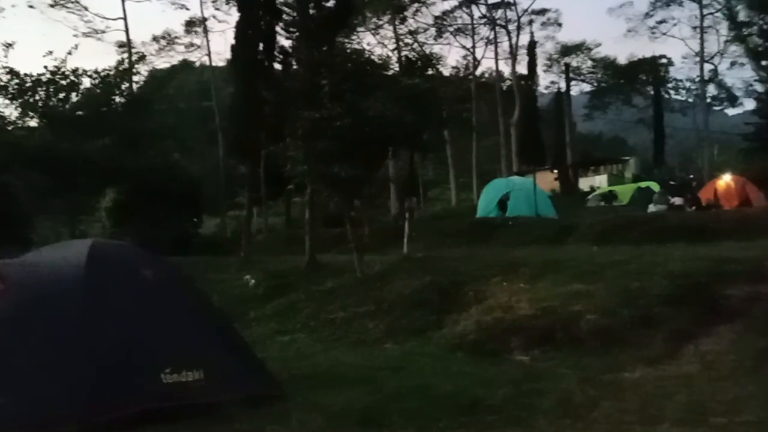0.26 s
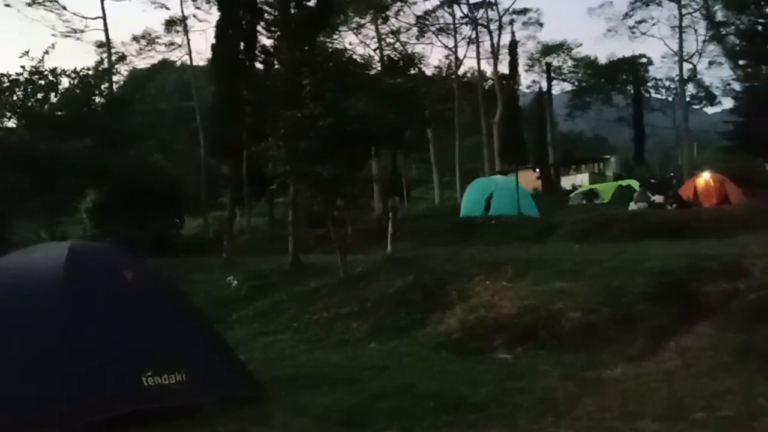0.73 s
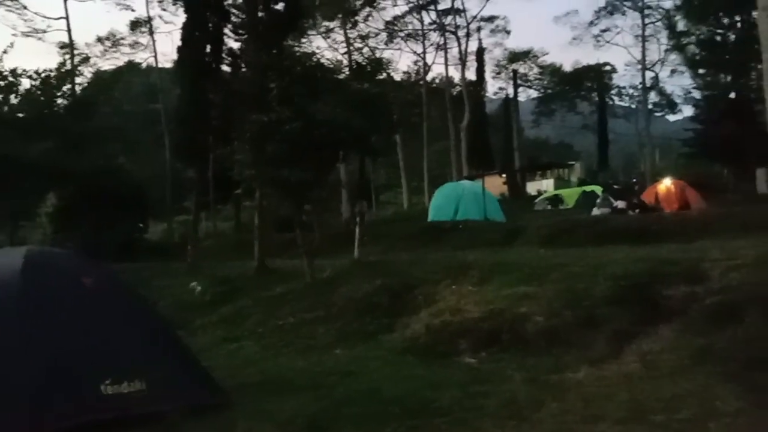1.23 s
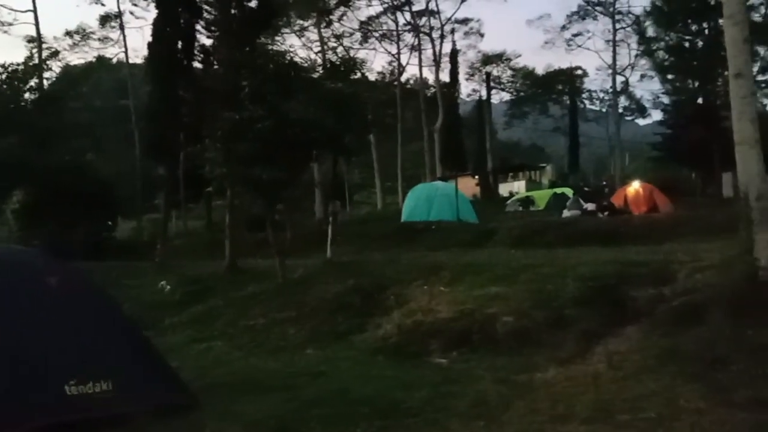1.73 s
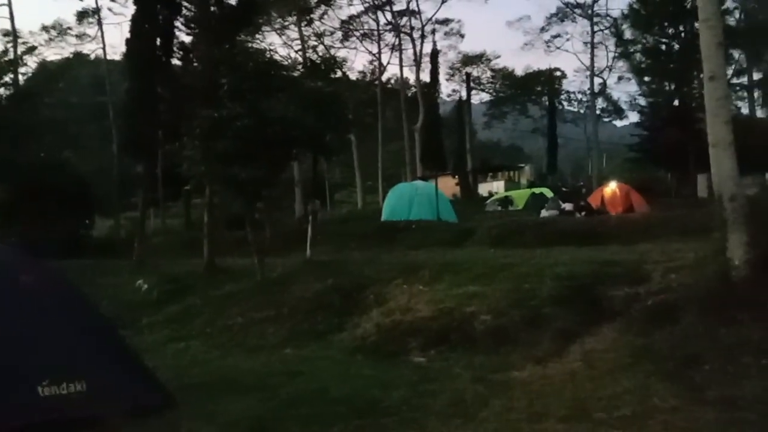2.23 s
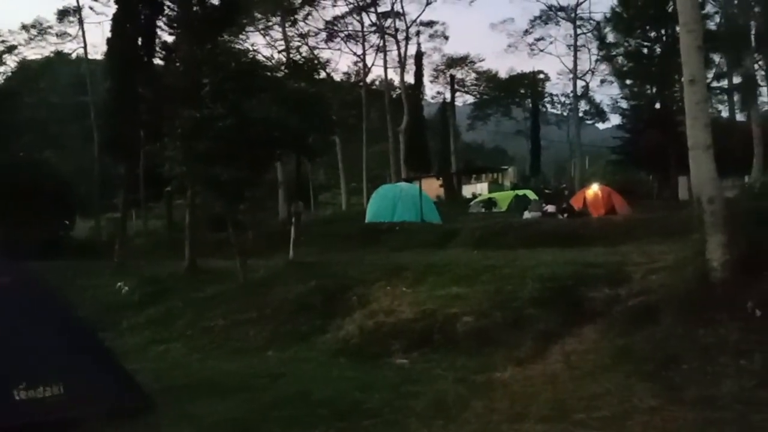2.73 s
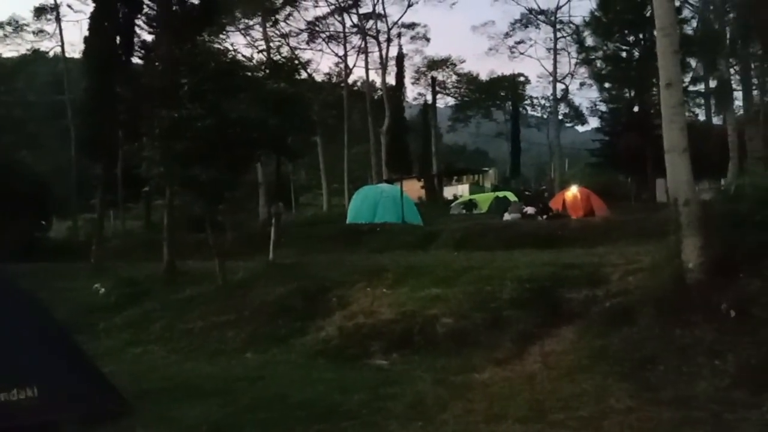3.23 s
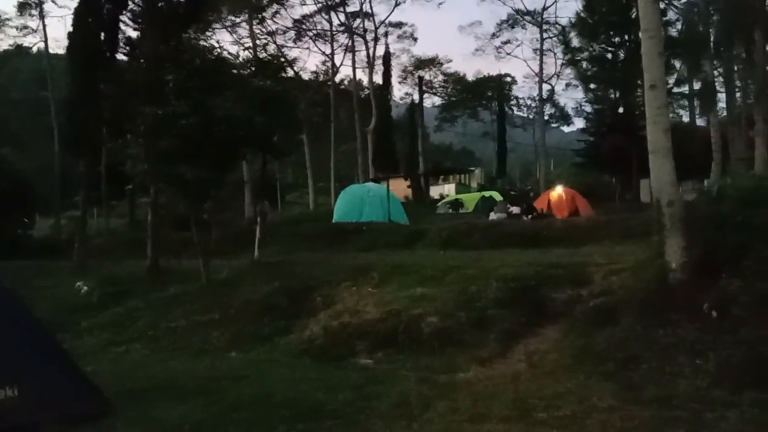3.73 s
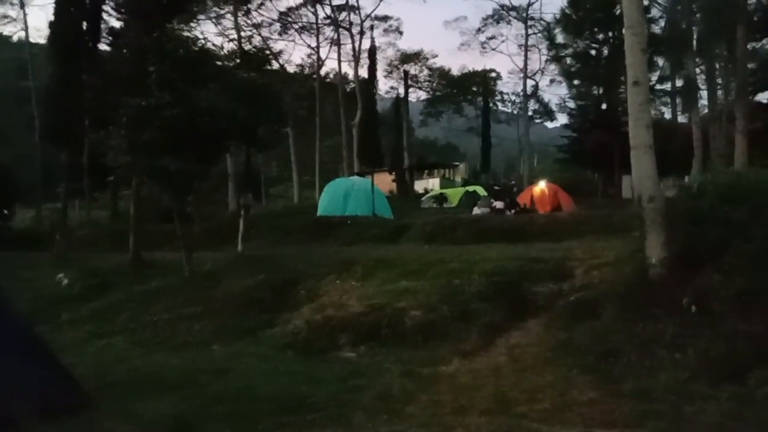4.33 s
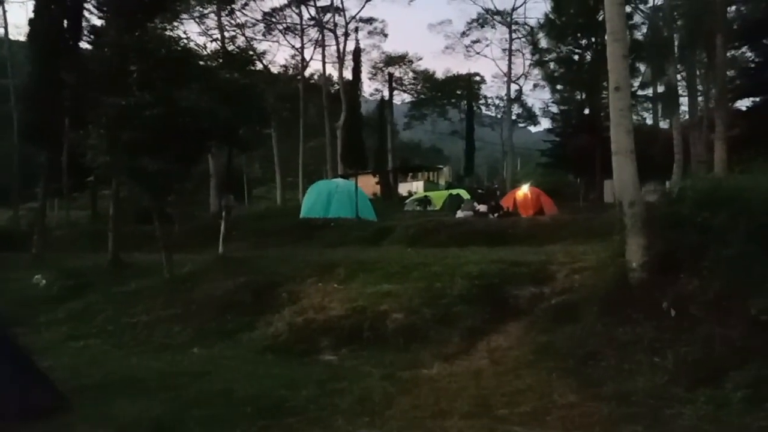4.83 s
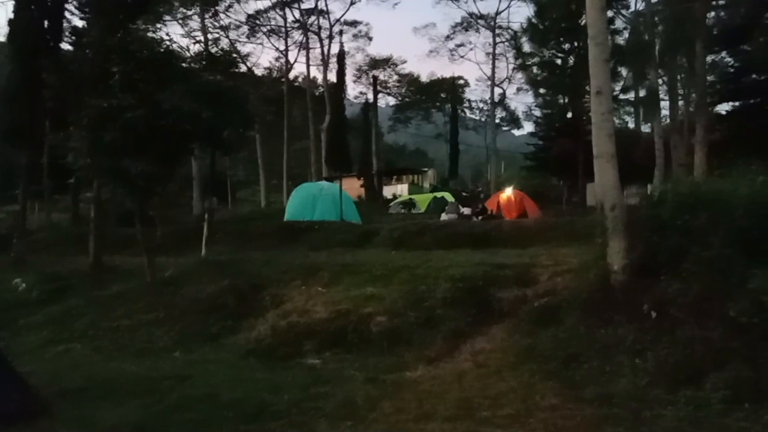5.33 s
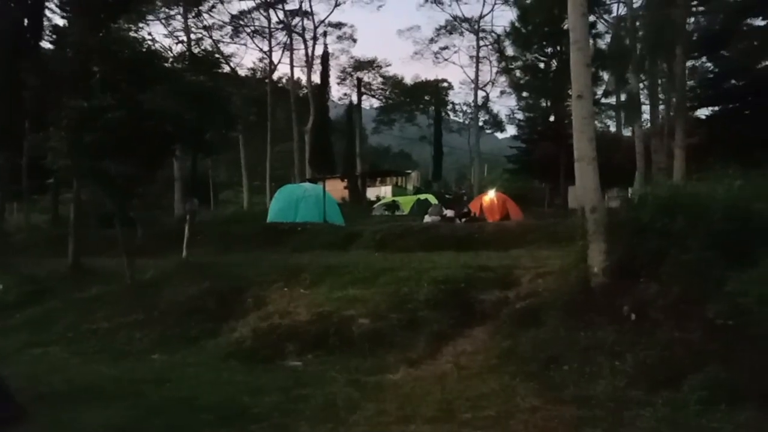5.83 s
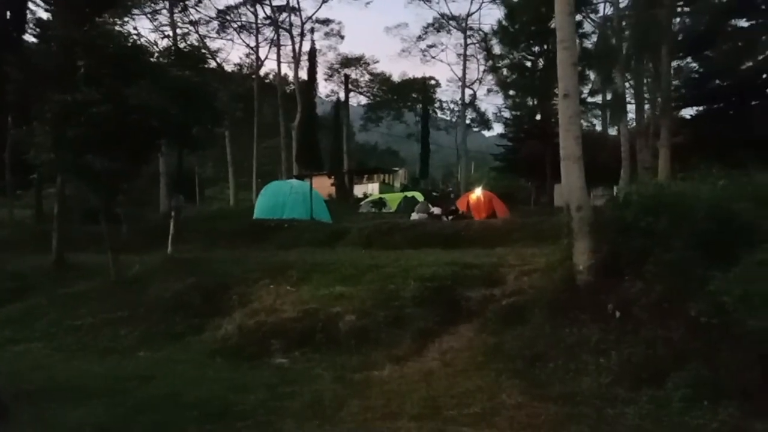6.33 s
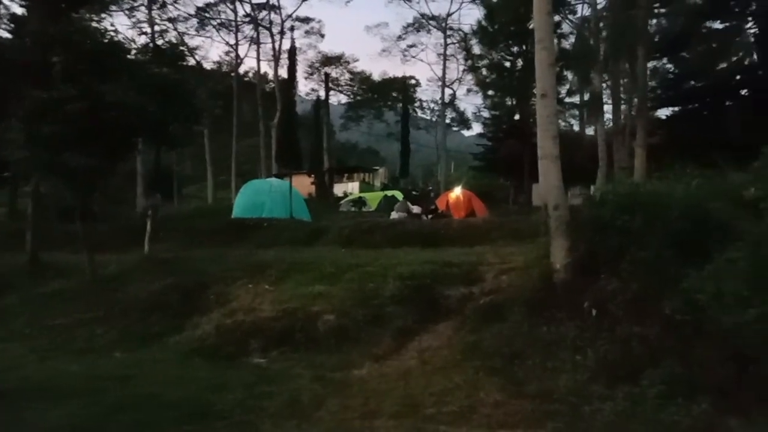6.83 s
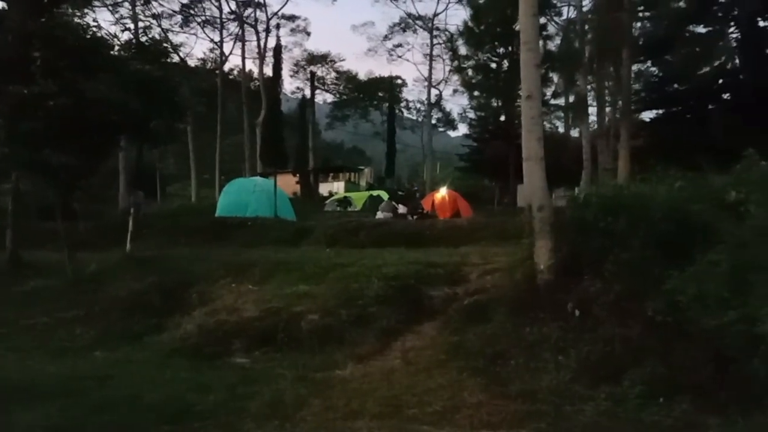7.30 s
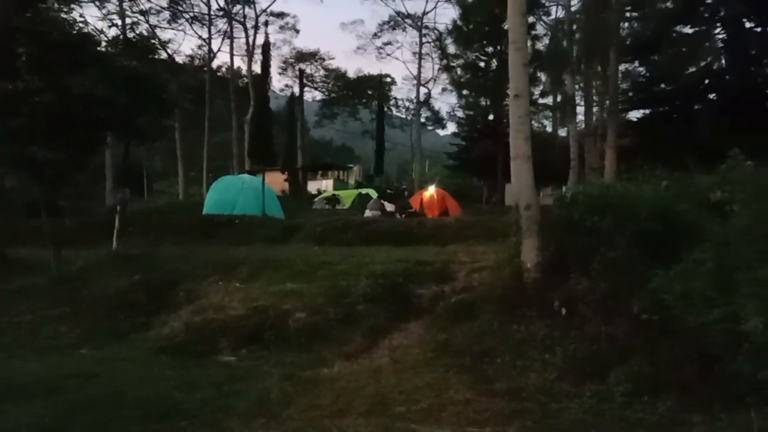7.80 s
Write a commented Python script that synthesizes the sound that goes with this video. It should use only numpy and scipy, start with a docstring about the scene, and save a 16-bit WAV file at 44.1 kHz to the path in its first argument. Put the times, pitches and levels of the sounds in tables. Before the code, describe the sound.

At a forest campsite at dusk, small birds chatter in swells throughout, their short whistles and slurred notes echoing lightly among the trees. Behind them insects hiss faintly, a cricket chirps about once a second and a far bird gives a few soft hoots. From about halfway the handheld phone is bumped softly and a faint low hum comes up. Near the end its case clicks once.

```python
"""Dusk at a forest campsite. From the start small birds chatter in swells, and their whistles and slurs
echo among the trees. Behind them an insect chorus hisses, a cricket chirps about once a second and a
far bird hoots softly; the phone's noise suppressor lets the background up whenever the flock is loud.
From about halfway the phone is bumped softly and a faint hum comes up. Near the end its case clicks."""
import sys
import numpy as np
from scipy import signal
from scipy.fft import rfft, irfft, next_fast_len
from scipy.io import wavfile
from scipy.ndimage import uniform_filter1d

SR = 44100
rng = np.random.default_rng(int(sys.argv[2]) if len(sys.argv) > 2 else 0)


def pcm_store(signal):
    """Save signal as 16-bit PCM."""
    levels = np.round(np.clip(np.atleast_2d(signal), -1, 1) * 32767)
    wavfile.write(sys.argv[1], SR, levels.astype(np.int16).T)


N = 355434
TIME = np.arange(N) / SR

# Each row: start and length in seconds, first, held and last pitch in Hz, level in dB.
WHISTLE_NOTES = [(0.324,0.085,3220,2717,2690,-42), (0.448,0.078,3450,3025,2520,-47.5),
                 (0.527,0.066,3050,3080,2990,-48.5), (0.646,0.12,2883,2708,2780,-42.5),
                 (0.846,0.076,2382,2516,1830,-39), (1.102,0.062,3280,3220,2580,-55),
                 (1.443,.095,3170,2897,2940,-50), (1.657,0.045,3620,3460,3570,-51.5),
                 (1.786,.055,3420,2970,3100,-59), (2.052,0.055,3000,3240,3180,-49),
                 (2.16,0.091,3330,2960,3020,-40.5), (2.238,0.051,2907,2886,2790,-47),
                 (2.826,0.034,3190,3260,3040,-66), (3.15,.072,2895,2750,2880,-54),
                 (3.597,0.085,2320,2850,2920,-52.5), (3.752,0.055,2520,2754,2770,-40.5),
                 (3.891,.04,2770,3160,2960,-41.5), (4.038,0.068,2677,2600,3100,-46.5),
                 (4.388,0.079,3250,2970,2630,-59.5), (4.851,0.075,2980,2900,2920,-40),
                 (5.029,0.078,2680,2573,2094,-39), (5.268,0.05,2940,3198,3040,-41),
                 (5.354,.044,2520,2910,2890,-38.5), (5.39,0.056,3137,2922,2795,-39),
                 (5.619,0.094,2490,2973,3020,-40), (5.683,.076,2164,2841,2807,-35),
                 (6.584,.06,2750,2705,2140,-38), (6.956,.075,2920,2685,2710,-50.5),
                 (7.255,.062,2733,2690,2200,-45)]
# Each row: start in seconds, middle pitch in Hz, glide in octaves, level in dB.
SLUR_NOTES = [(.234,3317,-0.078,-51.5), (.569,2216,-0.083,-48.5), (.787,2104,0.56,-47),
              (1.354,2653,-0.013,-56.5), (1.869,2470,-0.47,-58), (2.342,2910,-0.12,-58.5),
              (2.58,2825,-.12,-58), (2.74,2480,-.38,-61), (2.877,2175,0.1,-54.5), (2.927,2350,-0.15,-52),
              (3.415,2810,0.044,-48.5), (3.473,2415,-.35,-53.5), (3.861,2660,.09,-48.5),
              (4.017,3010,-.2,-56.5), (4.103,2560,-.4,-45.5), (4.338,3430,-0.2,-72.5),
              (4.758,3113,0.015,-44), (5.077,3490,0.024,-45), (5.198,3220,-0.16,-53.5),
              (5.285,2480,-.27,-50), (5.513,3200,0.12,-43), (5.741,3170,-0.018,-41.5),
              (6.201,3183,0.089,-50.5), (6.384,2630,-.26,-41), (6.695,2130,0.082,-43.5),
              (7.761,2850,-0.22,-57.5), (7.938,3350,-0.068,-50.5)]
# Hoarse rising notes. Each row: start and length in seconds, middle pitch in Hz, level in dB.
RISER_NOTES = [(1.926,0.042,4300,-60.5), (5.393,0.043,3950,-46.5), (6.352,0.076,3600,-58),
               (7.966,0.062,4310,-58.5)]
# A busier flock calls more roughly. Each row: flock level in dB, roughness from 0 to 1.
CALL_ROUGHNESS = [(-58, 0.12), (-50, 0.22)]
def near_birds(flock_db, slur_s=0.0363, riser_octaves=0.3, riser_rough=0.5):
    """Reverberation: calls scatter off near trunks, then the forest. Returns sound and dry envelope."""
    slurs = [(start, slur_s, *slide(hz, octaves), db) for start, hz, octaves, db in SLUR_NOTES]
    risers = [(start, length, *slide(hz, riser_octaves), db, riser_rough)
              for start, length, hz, db in RISER_NOTES]
    rough = np.interp(flock_db, *np.transpose(CALL_ROUGHNESS))
    calls = [(*row, np.interp(row[0], TIME, rough)) for row in WHISTLE_NOTES + slurs]
    tone, envelope = notes(calls + risers)
    scattered = reverb(tone, db=-10, decay_s=0.015)
    return reverb(scattered, db=-12, decay_s=0.08), envelope


def notes(rows, bend_s=0.02976, fade_in_s=0.012, fade_out_s=0.007, waver=0.007, uneven_db=1.34):
    """Frequency and amplitude modulation roughen tones that bend onto a held pitch and off it."""
    tone, envelope = np.zeros(N), np.zeros(N)
    shake, tremor, sway = np.tanh(walk(950)), walk(350), walk(70)
    for start, length, first, held, last, db, rough in rows:
        t = TIME[:int(length * SR)]
        u, left = t / t[-1], t[-1] - t
        at = int(rng.random() * (N - SR)) + np.arange(len(t))  # this note's stretch of the modulators
        entering, leaving = np.maximum(1 - np.array([t, left]) / min(bend_s, t[-1]), 0) ** 2
        glide = held + (first - held) * entering + (last - held) * leaving
        hz = glide * (1 + 0.144 * rough * shake[at] + waver * sway[at])
        fade = np.minimum(t / fade_in_s, left / fade_out_s)
        edges = np.sin(np.pi / 2 * np.minimum(fade, 1)) ** 2
        arch = (u * np.sqrt(1 - u)) ** 0.32  # builds up, then breaks off
        shape = unit(arch * edges * undb(uneven_db * sway[at]))
        flutter = np.exp(0.75 * rough * tremor[at])
        add(tone, start, undb(db) * unit(shape * flutter * sine(hz)))
        add(envelope, start, undb(db) * shape)
    return tone, envelope


# Swells of chatter. Each row: start and length in seconds, nominal level in dB.
FLOCK_SWELLS = [(0.108,0.19,-58.5), (0.331,0.37,-52.5), (0.742,0.23,-45.5), (2.038,0.17,-58.5),
                (2.167,0.093,-49.5), (2.554,0.14,-62), (2.84,0.19,-57), (3.44,0.3,-50), (3.84,0.21,-65),
                (4.143,0.094,-60.5), (5.04,0.32,-57.5), (5.294,0.13,-47), (5.459,0.55,-49.5),
                (5.663,0.097,-50), (6.138,0.23,-53), (6.333,0.39,-44.5), (6.954,0.42,-51.5),
                (7.241,0.096,-53), (7.38,0.42,-61.5), (7.962,0.18,-52)]
def flock_level(attack_s=0.019, grow_db=5.5, release_s=0.053, rest_db=-70.5):
    """Incoherent sources add in power: swells rise and die over a resting level. Returns dB."""
    power = undb(rest_db + 0.61 * walk(4.1)) ** 2
    for start, length, db in FLOCK_SWELLS:
        age = TIME - start
        attack = np.clip(age / attack_s, 0, 1)
        growth = undb(db + grow_db * (np.clip(age / length, 0, 1) - 1.5))
        release = np.exp(-np.maximum(age - length, 0) / release_s)
        power += (attack * growth * release) ** 2
    return 10 * np.log10(power)


def twitter(flock_db, centre_hz=2530, glide_octaves=0.1944, rough=0.21, count=460):
    """Superposition: many tiny glides overlap and reverberate, following the flock's level."""
    rows = []
    for slot, (offset, stretch) in enumerate(rng.random((count, 2))):
        start = TIME[int((slot + offset) / count * N)]
        height, slope, strength = np.clip(rng.standard_normal(3), -2.4, 1.6)
        pitches = slide(centre_hz * np.exp(0.17 * height), glide_octaves * slope)
        db = -2 + 2 * strength - 2.1 * height ** 2  # weaker away from the centre pitch
        rows.append((start, 0.0199 + 0.03 * stretch, *pitches, db, rough))
    return reverb(notes(rows)[0], db=-3.5, decay_s=0.093) * undb(flock_db)


# Each row: frequency in Hz, relative level in dB.
CHATTER_SPECTRUM = [(700, -35.5), (1380, -22.5), (1650, -15.5), (1950, -11.5), (2250, -3.5), (2670, 2.5),
                    (3000, -2.5), (3280, -5.5), (3550, -26.5), (4300, -23), (5600, -58)]
def chatter(flock_db, call_envelope, rate_hz=260, patchy_db=3):
    """Source and filter: the farthest calls merge into a rattle whose bands fade independently."""
    cycles = np.cumsum(rate_hz * np.exp(0.45 * walk(200))) / SR
    pulses = unit(np.diff(np.floor(cycles), prepend=0))
    wash = colour(pulses + rng.standard_normal(N), CHATTER_SPECTRUM)
    lowpasses = [signal.butter(6, hz, fs=SR, output="sos") for hz in np.linspace(1500, 3500, 7)]
    below = [0] + [signal.sosfiltfilt(sos, wash) for sos in lowpasses] + [wash]
    bands = sum((upper - lower) * undb(patchy_db * walk(19)) for lower, upper in zip(below, below[1:]))
    gain = np.hypot(undb(flock_db - 1), undb(-15) * call_envelope)
    return unit(shimmer(bands, depth_db=6)) * gain


# Two impacts heard as one click. Each row: start in seconds, nominal level in dB.
CASE_IMPACTS = [(7.607, -34.5), (7.62, -38)]
# Each row: mode frequency in Hz, relative level in dB.
CASE_RESONANCES = [(1300, -19.5), (1790, -2.5)]
# Each row: frequency in Hz, relative level in dB.
CRACK_SPECTRUM = [(950, -33), (1500, -7), (3100, -6), (3700, -20), (4700, -6.5), (5800, -15.5),
                  (8600, -17.5), (9500, -34), (11000, -19), (12500, -42)]
def case_click(rise_s=0.001, ring_s=0.0055):
    """Damped modes: each impact gives a dry crack and a short hollow ring of the case."""
    body, t = np.zeros(N), TIME[:SR // 10]
    modes = sum(undb(db) * np.sin(2 * np.pi * hz * t) for hz, db in CASE_RESONANCES)
    ringing = 2 * modes * (1 - np.exp(-t / rise_s)) * np.exp(-t / ring_s)
    for start, db in CASE_IMPACTS:
        add(body, start, undb(db) * ringing)
    return body + undb(-3) * knocks(CASE_IMPACTS, CRACK_SPECTRUM, rise_s=0.0008, decay_s=0.005)


# Each row: start in seconds, nominal level in dB.
PHONE_BUMPS = [(3.41, -60), (3.905, -57), (4.30, -59), (5.512, -52), (5.72, -61), (6.64, -50), (7.287, -56)]
def bumps():
    """Structure-borne sound: soft bumps on the phone excite a resonance near 150 Hz."""
    spectrum = [(30, -27), (80, -9), (150, 26), (240, -18), (600, -18.5), (2000, -72)]
    return knocks(PHONE_BUMPS, spectrum, rise_s=0.0065, decay_s=0.034)


def knocks(impacts, spectrum, rise_s, decay_s):
    """Impact excitation: contact noise, coloured by a body, rises fast and decays exponentially."""
    envelope, t = np.zeros(N), TIME[:SR // 2]
    for start, db in impacts:
        add(envelope, start, undb(db) * (1 - np.exp(-t / rise_s)) * np.exp(-t / decay_s))
    return envelope * unit(colour(rng.standard_normal(N), spectrum))


# Each row: centre and half width in Hz, relative level in dB.
CHORUS_BANDS = [(1797, 294, -4), (2350, 320, -4), (4268, 393, -2.5), (5110, 400, -9), (6608, 560, -10),
                (8000, 930, -15.5), (10430, 420, -38.5)]
# Each row: time in seconds, gain in dB.
CHORUS_GAIN = [(0, -62.5), (.8, -61), (1.7, -62), (4.9, -63), (5.9, -61.5), (8.06, -60.5)]
def chorus(drift_db=2, flicker_db=1.2):
    """Incoherent summation: far insects and frogs merge into bands of hiss that flicker a little."""
    bands = sum(noise(hz, width) * undb(db + drift_db * walk(1) + flicker_db * walk(17))
                for hz, width, db in CHORUS_BANDS)
    gain = undb(np.interp(TIME, *np.transpose(CHORUS_GAIN)))
    return shimmer(bands, depth_db=7) * np.exp(0.19 * walk(670)) * gain


# Each row: start in seconds, nominal level in dB.
CRICKET_CHIRPS = [(-.022, -66), (0.962, -65), (2.09, -62.5), (3.059, -63), (4.094, -63.5), (5.397, -61.5),
                  (6.339, -62), (7.335, -59.5)]
def cricket(period_s=0.034, stroke_s=0.012, first_hz=6420, last_hz=6040, first_stroke_db=-5):
    """Stridulation: five grainy wing strokes make a chirp, each falling in pitch."""
    chirps = np.zeros(N)
    u = np.linspace(0, 1, int(stroke_s * SR))
    for start, db in CRICKET_CHIRPS:
        for k in range(5):
            hz = (first_hz + (last_hz - first_hz) * u) * (1 + 0.0032 * rng.standard_normal())
            stroke = unit(np.sin(np.pi * u) * sine(hz, rng.random()))
            add(chirps, start + k * period_s, undb(db + first_stroke_db * (k == 0)) * stroke)
    return reverb(chirps * np.exp(0.29 * walk(450)), db=-8, decay_s=0.024)


# Each row: start and length in seconds, first and last pitch in Hz, level in dB.
FAR_HOOTS = [(0.261,0.079,620,578,-70), (.343,0.082,594,510,-73.5), (3.893,0.092,857,905,-65)]
def hoots(waver=0.014):
    """Scattering by the trees smears a far bird's soft, wavering glides."""
    calls = np.zeros(N)
    for start, length, first, last, db in FAR_HOOTS:
        u = np.linspace(0, 1, int(length * SR))
        hz = (first + (last - first) * u) * (1 + waver * walk(72)[:len(u)])
        add(calls, start, undb(db) * unit(np.sin(np.pi * u) * sine(hz)))
    return reverb(calls, db=-5, decay_s=0.026)


def rumble(rise_db_per_s=0.5, patchy_db=2.5):
    """Filtered noise: air and the hand on the phone give a slowly growing low rumble."""
    air = unit(colour(rng.standard_normal(N), RUMBLE_SPECTRUM))
    return air * undb(-76 + rise_db_per_s * TIME + patchy_db * walk(10.4))


def drone(hz=161):
    """A drifting pure tone: a faint hum, perhaps a far motor, comes up in the second half."""
    hum = unit(sine(hz * (1 + 0.00985 * walk(2.1))))
    fade = np.interp(TIME, [4.5, 5.4, 7.4, 8.06], [0.01, 0.35, 0.57, 0.33])
    return hum * undb(-74.5 + 2 * walk(18)) * fade


# Each row: time in seconds, nominal level in dB.
BUZZ_LEVEL = [(0, -102), (2.2, -86.5), (2.9, -93), (4.1, -87.5), (6.4, -101), (6.65, -88), (8.06, -90)]
def buzz(hz=11250, width_hz=260, flicker_db=3):
    """Narrowband noise: one insect's thin, high buzz comes and goes."""
    level_db = np.interp(TIME, *np.transpose(BUZZ_LEVEL))
    return noise(hz, width_hz) * undb(level_db + flicker_db * walk(20))


def high_chirps(hz=10450, spread=0.026, length_s=0.058, db=-93, rough=0.21, count=60):
    """A random point process: tiny, very high insect chirps fall at independent moments."""
    rows = [(when * N / SR, length_s, *slide(hz * np.exp(spread * (4 * height - 2)), 0), db, rough)
            for when, height in rng.random((count, 2))]
    return notes(rows)[0]


def suppressor(sound, unity_db=-50, slope=0.4, window_s=0.026):
    """Dynamic expansion: the noise suppressor's gain grows with the short-term rms of a sound."""
    power = uniform_filter1d(sound ** 2, int(window_s * SR)) + 1e-14
    return (np.sqrt(power) / undb(unity_db)) ** slope


def shimmer(x, depth_db, size=1536):
    """Spectral modulation: narrow lines of a hiss each come and go in about a tenth of a second."""
    lines = signal.stft(x, nperseg=size)[2]
    chance = uniform_filter1d(rng.standard_normal(lines.shape), 5, axis=1)
    chance = unit(uniform_filter1d(chance, 3, axis=0))
    flickering = signal.istft(lines * undb(depth_db * np.tanh(chance)), nperseg=size)[1]
    return unit(flickering[:N]) * np.std(x)


def colour(x, spectrum, size=4096):
    """Minimum-phase filtering: x rings through a body with the given (Hz, dB) spectrum."""
    hz, db = np.transpose(spectrum)
    gain = undb(np.interp(np.log(np.fft.rfftfreq(size, 1 / SR) + 1), np.log(hz), db))
    cepstrum = irfft(np.log(gain))[:size // 2]
    cepstrum[1:] *= 2
    return signal.fftconvolve(x, irfft(np.exp(rfft(cepstrum, size))))[:len(x)]


def reverb(x, db, decay_s):
    """Convolution with decaying noise adds a diffuse tail."""
    tail = rng.standard_normal(SR) * np.exp(-TIME[:SR] / decay_s)
    return x + undb(db) * signal.fftconvolve(x, tail / np.linalg.norm(tail))[:N]


def noise(centre_hz, width_hz):
    """A Gaussian band of noise, rms 1."""
    size = next_fast_len(N, real=True)
    bell = np.exp(-((np.fft.rfftfreq(size, 1 / SR) - centre_hz) / width_hz) ** 2)
    return unit(irfft(rfft(rng.standard_normal(size)) * bell, size)[:N])


def walk(rate_hz):
    """Low-pass noise as a smooth random modulator, rms 1."""
    return noise(0, rate_hz)


def sine(hz, start_cycles=0):
    """An oscillator: phase is the integral of frequency."""
    return np.sin(2 * np.pi * (np.cumsum(hz) / SR + start_cycles))


def slide(hz, octaves):
    """First, middle and last pitch of a glide, at equal ratios."""
    return hz * 2 ** (-octaves / 2), hz, hz * 2 ** (octaves / 2)


def undb(db):
    """Decibels to gain."""
    return 10 ** (np.asarray(db) / 20)


def unit(x):
    """Scale to rms 1."""
    return x / np.sqrt(np.mean(x ** 2) + 1e-20)


def add(out, start, x):
    """Mix x into out from a start time in seconds."""
    i = int(start * SR)
    x, i = x[max(-i, 0):], max(i, 0)
    out[i:i + len(x)] += x[:max(N - i, 0)]


def scene():
    """Superposition in mono: the flock's sound sets the gain of the insects, rumble and hiss."""
    flock_db = flock_level()
    calls, call_envelope = near_birds(flock_db)
    birds = calls + twitter(flock_db) + chatter(flock_db, call_envelope)
    background = chorus() + buzz() + high_chirps() + cricket() + rumble() + undb(-83) * noise(990, 1100)
    foreground = birds + bumps()
    mic_noise = undb(-90) * rng.standard_normal(N)
    mix = foreground + case_click() + hoots() + drone() + background * suppressor(birds) + mic_noise
    return mix[None]


def record(dry, top_hz=15300):
    """Low-pass filtering: the phone cuts the highest treble."""
    return signal.sosfilt(signal.ellip(8, 0.2, 70, top_hz, fs=SR, output="sos"), dry)


# Each row: frequency in Hz, relative level in dB.
RUMBLE_SPECTRUM = [(25, -24.5), (60, -7.5), (100, 0.5), (150, 2), (240, -5.5), (450, -12.5), (1200, -18),
                   (5000, -69)]

dry = scene()
out = record(dry)
pcm_store(out)
```